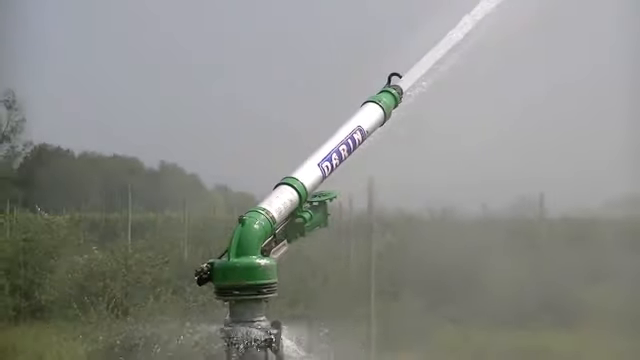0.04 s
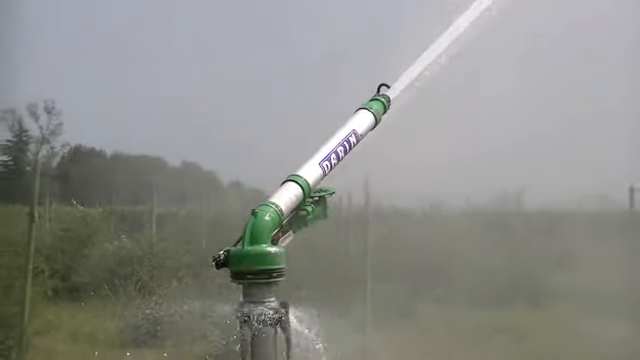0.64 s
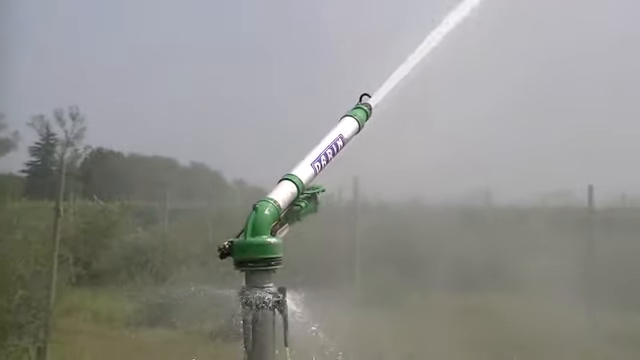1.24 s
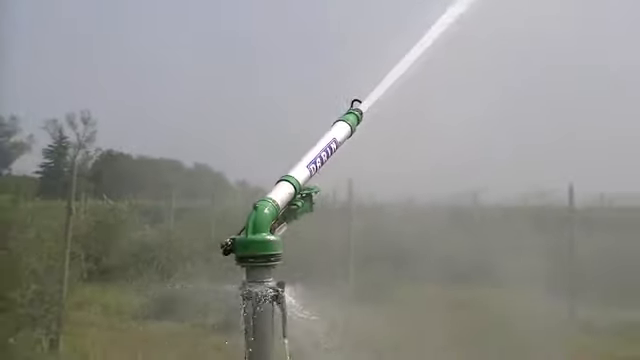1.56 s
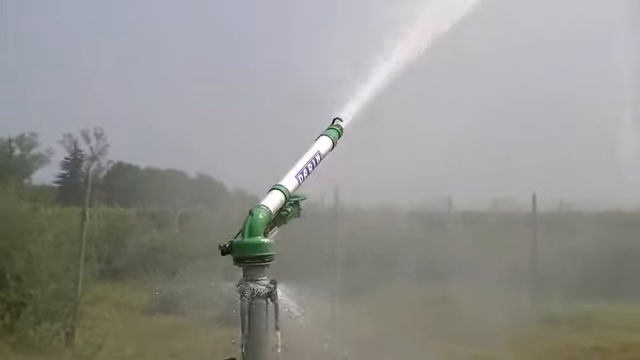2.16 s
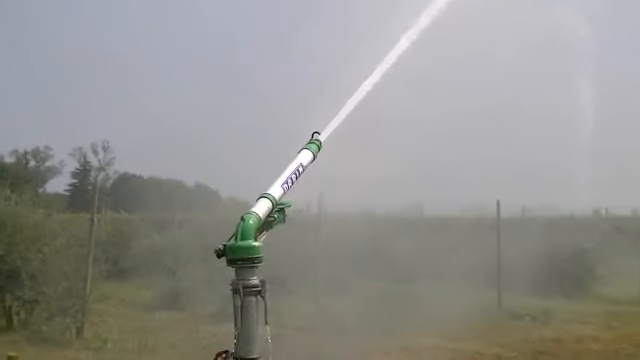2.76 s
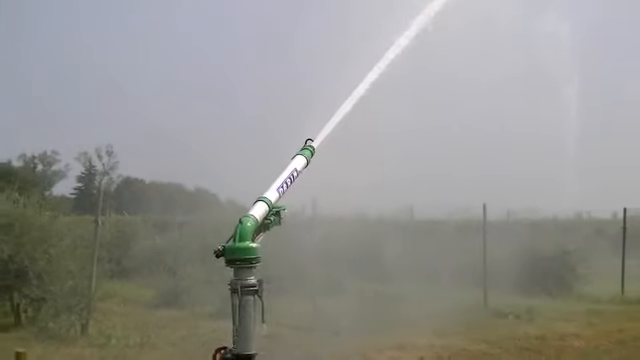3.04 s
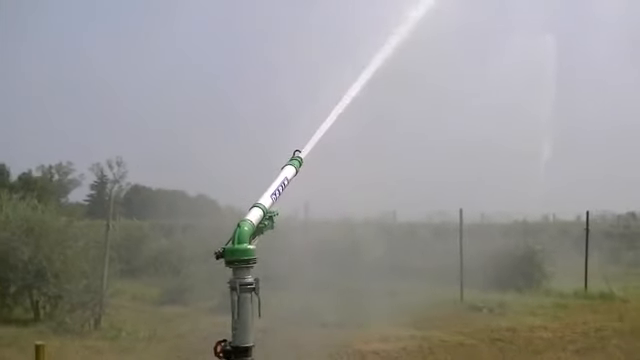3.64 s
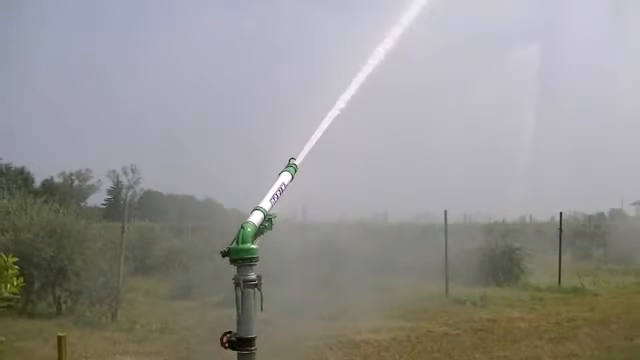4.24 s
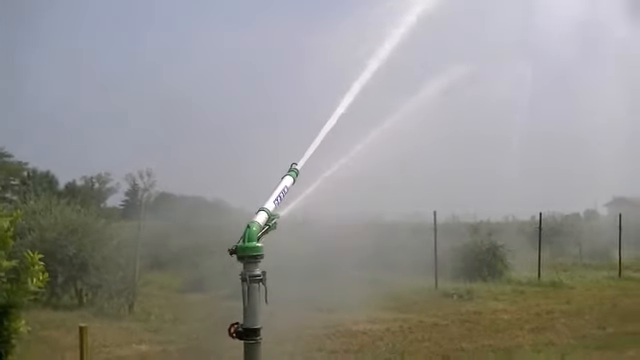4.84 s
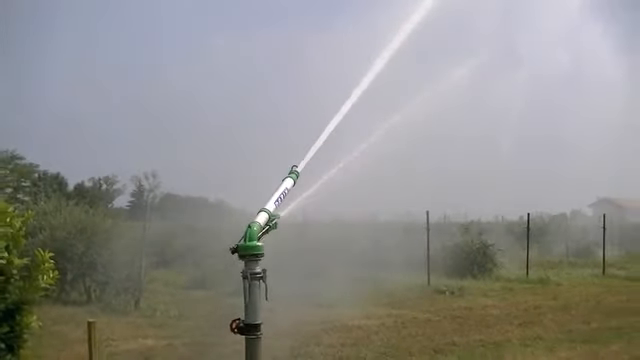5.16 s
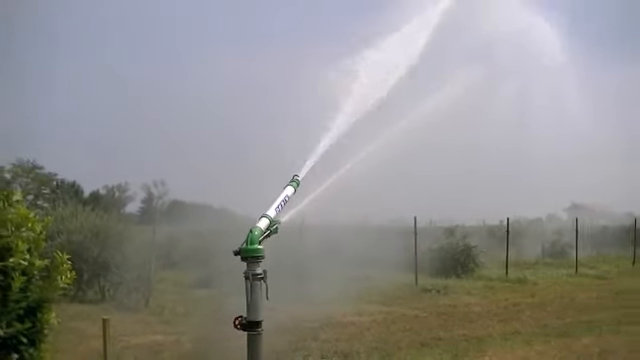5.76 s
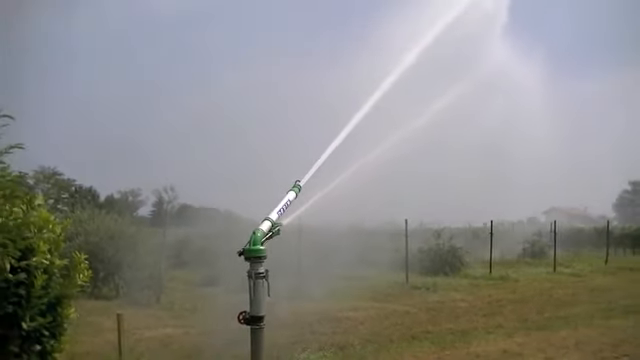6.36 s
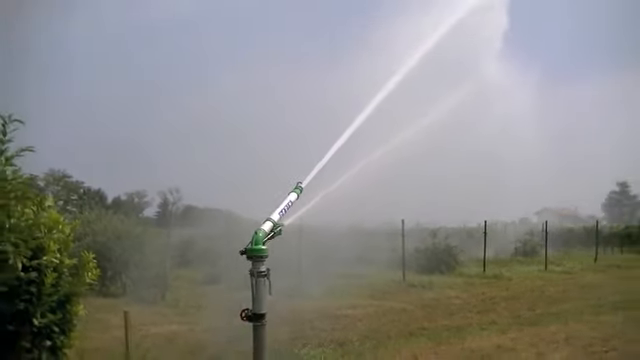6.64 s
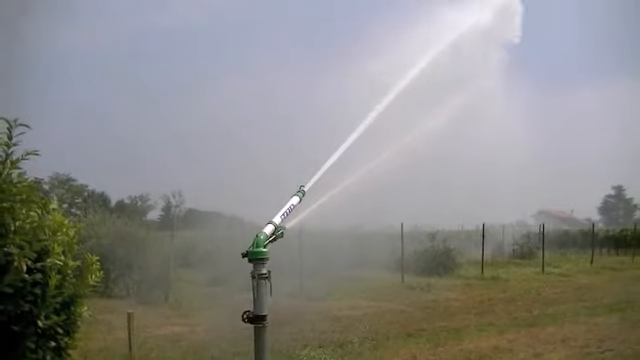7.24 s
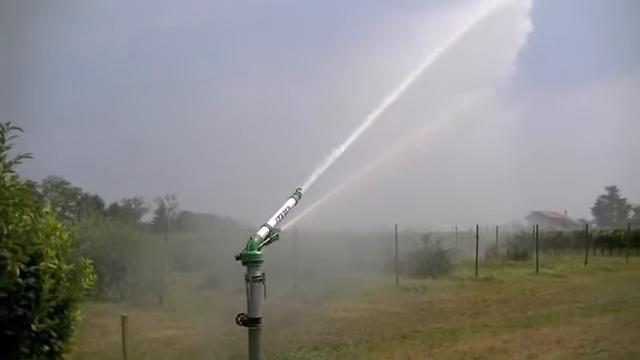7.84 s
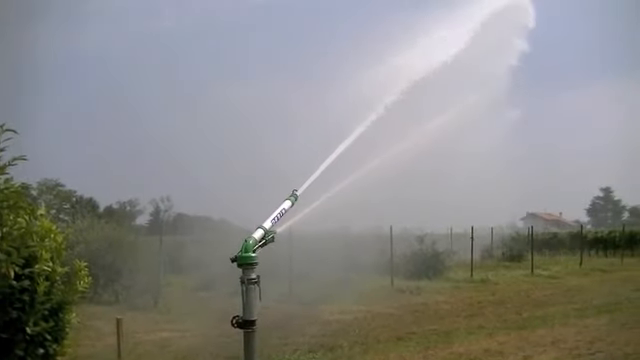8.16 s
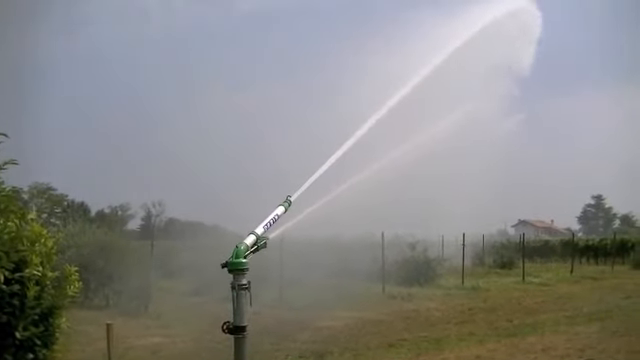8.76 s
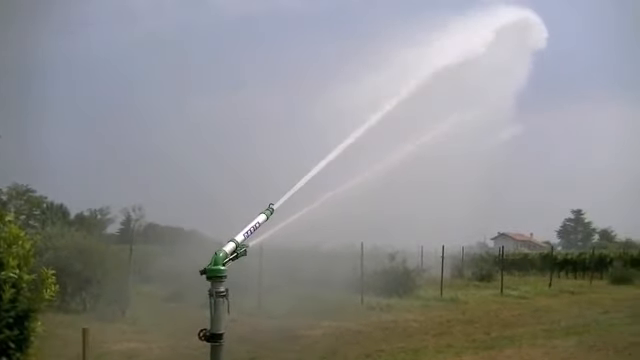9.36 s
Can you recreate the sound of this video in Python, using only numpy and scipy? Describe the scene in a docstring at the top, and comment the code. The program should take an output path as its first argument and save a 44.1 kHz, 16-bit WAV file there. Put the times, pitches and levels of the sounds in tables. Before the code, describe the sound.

A large irrigation sprinkler shoots a steady, hissing jet of water that swells softly about once a second, with a faint whine from its drive wheel. A leak hisses at first, then stops. Midway, a metal lever squeaks and clacks loudly with a short splash. Afterwards a brighter, sputtering spray joins in and the whine grows sharper. It is heard in mono from a few metres away in an open field, with a very faint distant pump hum.

```python
"""A big irrigation gun throws a water jet across a field, a few metres off, in mono.
From the start a far pump hums, the drive wheel sings faintly and the jet roars, bursting into spray
about once a second. A swivel leak hisses until it seals at 2.6 s. At 4.5 s the reversing lever squeals,
clacks over and slaps the jet; a drop ticks on metal before and after. The jet's roar dips briefly.
The wheel, now in the jet, slows, then sings brighter and chops off a second spray to the end."""
import sys
import numpy as np
from scipy import signal
from scipy.fft import rfft, irfft
from scipy.io import wavfile

SR = 44100
rng = np.random.default_rng(int(sys.argv[2]) if len(sys.argv) > 2 else 0)


def wav_out(sig):
    """Save sig, one row per channel (or a flat mono array), as 16-bit PCM at SR to the path in sys.argv[1]."""
    wavfile.write(sys.argv[1], SR, np.round(np.clip(np.atleast_2d(sig).T, -1, 1) * 32767).astype(np.int16))


N = 423360
T = np.arange(N) / SR
HZ = np.fft.rfftfreq(N, 1 / SR)

# wheel enters the jet, lever trips, wheel loses the water, catches it again
ENGAGE_S, TRIP_S, STALL_S, CATCH_S = 4.22, 4.515, 4.59, 4.75
SLAP_ATTACK_S = 0.032


def amp(db):
    """Decibels to gain."""
    return 10 ** (np.asarray(db) / 20)


def unit_rms(x):
    """Scale to rms 1."""
    return x / np.sqrt(np.mean(x ** 2) + 1e-20)


def curve(rows):
    """Rows of (seconds, value), interpolated at every sample."""
    return np.interp(T, *np.transpose(rows))


def ramp(start_s, length_s):
    """Linear rise from 0 to 1, then held."""
    return np.clip((T - start_s) / length_s, 0, 1)


def response(points):
    """Gain per frequency from rows of (Hz, dB), rolled off below the first."""
    hz, db = np.transpose(points)
    return amp(np.interp(np.log(HZ + 1), np.log(hz), db)) * np.minimum(HZ / hz[0], 1) ** 2


def colour(x, gain):
    """Minimum-phase filter, so clicks keep sharp fronts; output at rms 1."""
    log_gain = np.log(np.maximum(gain / gain.max(), 1e-5))
    phase = -signal.hilbert(np.r_[log_gain, log_gain[-2:0:-1]]).imag[:len(HZ)]
    return unit_rms(irfft(rfft(x) * np.exp(log_gain + 1j * phase), N))


def wander(rate_hz):
    """Random drift of rms 1, mostly slower than rate_hz."""
    noise = rfft(rng.standard_normal(N))
    return unit_rms(irfft(noise * (HZ > rate_hz / 20) / (1 + (HZ / rate_hz) ** 2), N))


def whistle(hz, width_hz):
    """Flow noise ringing one narrow resonance."""
    noise = rfft(rng.standard_normal(N))
    return unit_rms(irfft(noise / (1 + (2 * (HZ - hz) / width_hz) ** 2) ** 0.63, N))


def water(drops_per_s, spread_db, mist_db, sputter_db, sputter_hz):
    """Clumps of droplets, mostly small, in a mist; the finest spray smooths the top end."""
    sizes = amp(spread_db * np.minimum(rng.exponential(1, N), 3.5))
    drops = unit_rms(sizes * rng.choice([-1, 1], N) * (rng.random(N) < drops_per_s / SR))
    stream = drops + amp(mist_db) * rng.standard_normal(N)
    stream = unit_rms(stream * amp(sputter_db * wander(sputter_hz)))
    fine_share = 0.72 / (1 + (10500 / (HZ + 1)) ** 8)
    fine_spray = rfft(rng.standard_normal(N)) * np.sqrt(fine_share)
    return irfft(rfft(stream) * np.sqrt(1 - fine_share) + fine_spray, N)


def strikes(hits, spectrum, ring_db, contact_s=0.0008):
    """Hard blows on metal: impulse, short contact rattle, ring of the lever."""
    # Lever modes. Each row: frequency in Hz, relative level in dB, T60 in seconds.
    modes = [(1200, -9, .08), (1572, -9, .06), (2148, 0, .05), (2380, -5, .045), (3494, -7, .025),
             (4468, -5, .02), (5690, -13, .015)]
    out = np.zeros(N)
    for start_s, peak_db in hits:
        age_s = np.maximum(T - start_s, 0)
        blow = rng.standard_normal(N) * (T >= start_s) * np.exp(-age_s / contact_s)
        blow[round(start_s * SR) + 1] += 3.0
        ring = sum((-1) ** k * amp(db - 60 * age_s / t60_s) * np.cos(2 * np.pi * hz * age_s)
                   for k, (hz, db, t60_s) in enumerate(modes))
        hit = colour(blow, response(spectrum)) + amp(ring_db) * unit_rms(ring * (T >= start_s))
        out += amp(peak_db) * hit / abs(hit).max()
    return out


def engaged():
    """Depth of the wheel in the jet, 0 to 1."""
    return ramp(ENGAGE_S, TRIP_S - ENGAGE_S)


def dip(start_s=4.59, end_s=4.75, fall_s=0.041, rise_s=0.11):
    """1 during the brief dip in level after the clack, else 0."""
    return ramp(start_s - fall_s / 2, fall_s) * (1 - ramp(end_s - rise_s / 2, rise_s))


def bite(free_db=-10, driven_db=3, rise_s=0.11):
    """Gain of overtones and whistles, rising as the blades catch the jet."""
    return amp(free_db + (driven_db - free_db) * ramp(CATCH_S - rise_s, rise_s))


def pump():
    """A far pump hums, wavering in the open air."""
    # Each row: frequency in Hz, rms level in dB.
    partials = [(68.6, -77.5), (137, -69)]
    return np.sqrt(2) * sum(amp(db + 1.5 * wander(3.4)) * np.sin(2 * np.pi * hz * T + 0.45 * wander(3.2))
                            for hz, db in partials)


def ticks():
    """Near drops tick on metal."""
    # Each row: start in seconds, peak in dB.
    hits = [(3.7065, -11), (4.986, -19)]
    # Each row: frequency in Hz, relative density in dB.
    spectrum = [(1000, -25), (4500, -19), (7000, 8), (9000, 3), (12000, -18), (15000, -25)]
    return strikes(hits, spectrum, ring_db=-12)


def leak(start_db=-25, sag_db_per_s=0.6, seal_s=2.63, seal_db_per_s=140):
    """Water squeezes out of the swivel, weakening slowly until the joint seals."""
    # Each row: frequency in Hz, relative density in dB.
    spectrum = [(100, -49), (700, -31), (1400, -3.5), (2000, -1.5), (2300, 8.5), (2550, -5.5), (2800, 4),
                (3050, -5), (3400, 3), (3800, -2), (4550, 1), (5400, -6), (7200, 1.5), (9000, -9.5),
                (12000, -16), (15200, -45)]
    level_db = start_db - sag_db_per_s * T - seal_db_per_s * np.maximum(T - seal_s, 0)
    stream = water(3500, spread_db=2.6, mist_db=-0.82, sputter_db=0.58, sputter_hz=35)
    return amp(level_db) * colour(stream, response(spectrum))


def blade_hz(free_hz=671.2, driven_hz=710.4, kick_hz_per_s=850):
    """The wheel speeds up in the jet, is kicked by the slap, stalls, overshoots and settles."""
    sag_hz, spin_up_s, overshoot_hz, settle_s = 40.02, 0.065, 13, 0.25
    before_hz = free_hz + (driven_hz - free_hz) * engaged() + kick_hz_per_s * np.maximum(T - TRIP_S, 0)
    age_s = np.maximum(T - CATCH_S, -spin_up_s)
    after_hz = driven_hz - sag_hz * np.exp(-age_s / spin_up_s) + overshoot_hz * np.exp(-age_s / settle_s)
    return np.where(T < STALL_S, before_hz, after_hz)


def wheel(blades=8, free_db=-41, driven_db=-39.5, strain_db=4, dip_db=-10):
    """Blades chop the jet: one clear tone, with overtones that grow as they bite."""
    # Overtones. Each row: multiple of the shaft rate, relative level in dB.
    orders = [(14, -13.5), (16, -8.5), (24, -1), (40, -4.5), (48, -6), (56, -6.5)]
    turns = np.cumsum(blade_hz() * (1 + 0.002 * wander(13.6) + 0.001 * wander(1.52))) / SR / blades
    tone = np.sin(2 * np.pi * blades * turns) * amp(1.7 * wander(16))
    # slightly out of true: a side tone one shaft order lower
    side = np.sin(2 * np.pi * (blades - 1) * turns) * amp(3 * wander(9))
    overtones = sum(amp(db + 2.1 * wander(16)) * np.sin(2 * np.pi * (round(order) * turns + rng.random()))
                    for order, db in orders)
    lever_strain = engaged() ** 0.5 * (1 - ramp(TRIP_S, SLAP_ATTACK_S))
    level_db = free_db + (driven_db - free_db) * engaged() + strain_db * lever_strain + dip_db * dip()
    return np.sqrt(2) * amp(level_db) * (tone + amp(-14) * side + amp(-4) * bite() * overtones)


def drumming():
    """Spray rings the barrel and drive housing, which radiate no bass."""
    # Each row: frequency in Hz, width in Hz, relative level in dB.
    modes = [(1202, 60, -8.5), (1562, 53, -2.5), (2125, 116, -3), (2330, 116, 1.5), (2764, 110, 0),
             (3135, 150, -6.5), (3468, 137, -3), (4464, 220, -4.5), (4970, 110, -8.5), (5523, 120, -1.5),
             (6160, 97, -3), (7010, 187, 1.5)]
    power = sum(amp(db) ** 2 / (1 + (2 * (HZ - hz) / width_hz) ** 2) ** 2 for hz, width_hz, db in modes)
    stream = water(1800, spread_db=3.2, mist_db=-2.5, sputter_db=1.6, sputter_hz=40)
    return colour(stream, np.sqrt(power) * np.minimum(HZ / 800, 1) ** 2)


def edge_whistles():
    """Spray whistles thinly at the blade edges."""
    pitches_hz = [4463, 7645, 8352, 10522]
    # One row per pitch: width in Hz, relative level in dB at 4.8 s, the same at 9.6 s.
    bands = [(10, -20, -25), (55, -11.5, -10.5), (45, -19, -12), (70, -18.5, -26)]
    return sum(whistle(hz, width_hz) * amp(curve([(4.8, first_db), (9.6, last_db)]))
               for hz, (width_hz, first_db, last_db) in zip(pitches_hz, bands))


def spray(dip_db=-7.5):
    """Spray off the wheel hisses, drums, spits and whistles while the blades are in the jet."""
    # Hiss. Each row: frequency in Hz, relative density in dB.
    spectrum = [(100, -59), (1500, -15), (2300, -9), (3900, -9), (5500, -5), (6600, 1.5), (7300, -0.5),
                (9000, 0), (10300, -1), (11800, -9.5), (15200, -13)]
    # The gun swings round. Each row: time in seconds, gain in dB.
    swing = [(4.5, -27), (4.9, -26), (6.3, -26), (7.4, -24.5), (8.5, -24.5), (9.6, -26)]
    stream = water(4000, spread_db=4.5, mist_db=-1, sputter_db=1.0, sputter_hz=54)
    hiss = colour(stream, response(spectrum))
    housing = drumming()
    spit_band = np.exp(-((HZ - 7600) / 900) ** 2 / 2)
    spits = colour(rng.standard_normal(N) * amp(3.8 * np.clip(wander(70), -2.5, 2.5)), spit_band)
    mix = amp(-3.5) * hiss + amp(-6) * housing + amp(-8) * spits + bite() * edge_whistles()
    return engaged() * amp(curve(swing) + dip_db * dip()) * mix


def lever(squeal_hz=4980, squeal_db=-36, squeal_s=0.12, slap_db=-15, hold_s=0.0063, fall_db_per_s=430):
    """The reversing lever squeals under load, clacks on its stops and slaps through the jet."""
    # Blows on the stops. Each row: start in seconds, peak in dB.
    hits = [(4.5155, 1), (4.5184, -12), (4.5369, -9)]
    # Each row of both: frequency in Hz, relative density in dB.
    clack_spectrum = [(300, -34), (800, -13), (1400, -1), (2300, -1), (4300, 1.5), (6200, 0), (8000, -12),
                      (15000, -20)]
    slap_spectrum = [(200, -23), (600, -12), (1200, 0.5), (2300, 1.5), (3700, -1), (4600, 3), (6000, -4),
                     (8200, 5), (10500, -6.5), (15500, -18)]
    tripped = ramp(TRIP_S, SLAP_ATTACK_S)
    load = ramp(TRIP_S - squeal_s, squeal_s) ** 0.5 * (1 - tripped)
    squeal = amp(squeal_db) * load * whistle(squeal_hz, width_hz=50)
    clack = strikes(hits, clack_spectrum, ring_db=2.2)
    splash = water(5500, spread_db=1.7, mist_db=-0.91, sputter_db=0.8, sputter_hz=150)
    falling_s = np.maximum(T - TRIP_S - SLAP_ATTACK_S - hold_s, 0)
    slap_gain = tripped ** 1.7 * amp(slap_db - fall_db_per_s * falling_s)
    return squeal + clack + slap_gain * colour(splash, response(slap_spectrum))


def bursts():
    """The jet fans out and tears apart; coarse drops add a lower, rougher rush."""
    # Each row: centre in seconds, level in dB, Gaussian sigma in seconds.
    swells = [(1.094, -31.5, 0.11), (2.28, -30, 0.11), (3.49, -30.5, 0.11), (5.855, -29, 0.11),
              (6.98, -29, 0.077), (8.115, -28, 0.085), (9.257, -32, 0.15)]
    # Each row: frequency in Hz, relative density in dB.
    spectrum = [(60, -38), (250, -10), (600, -2.5), (1200, -1.5), (2300, 2.5), (4000, -7.5), (8000, -6.5),
                (15000, -22)]
    gain = sum(amp(db) * np.exp(-((T - centre_s) / sigma_s) ** 2 / 2) for centre_s, db, sigma_s in swells)
    stream = water(900, spread_db=1.9, mist_db=-5.5, sputter_db=1.0, sputter_hz=56)
    return gain * colour(stream, response(spectrum))


def jet(crossover_hz=5000, dip_db=-2.5):
    """The jet tears at the air and its fine droplets fizz; the roar dips briefly after the clack."""
    # Each row: frequency in Hz, relative density in dB.
    spectrum = [(45, -42), (90, -28), (170, -19.5), (280, -6), (410, -12), (570, -1.5), (1300, -2.5),
                (2200, 0.5), (4000, -6), (7000, 0), (8500, 1), (12000, -14), (13300, -13.5), (15200, -18.5)]
    # The gun swings round. Each row: time in seconds, rms level in dB.
    swing = [(0, -28), (2.6, -28), (3.1, -28.5), (4.3, -28.5), (5.2, -28), (9.6, -27)]
    treble_share = 1 / (1 + (crossover_hz / (HZ + 1)) ** 4)
    core = water(3000, spread_db=2.67, mist_db=-0.89, sputter_db=0.5, sputter_hz=32)
    droplets = water(3000, spread_db=4.2, mist_db=-0.99, sputter_db=1.24, sputter_hz=40)
    roar = colour(core, response(spectrum) * np.sqrt(1 - treble_share))
    fizz = colour(droplets, response(spectrum) * np.sqrt(treble_share))
    return amp(curve(swing) + dip_db * dip()) * unit_rms(roar + amp(-2) * fizz)


def scene():
    """All sources at one point in the open field."""
    mono = jet() + bursts() + leak() + spray() + wheel() + lever() + ticks() + pump()
    return np.array([mono, mono])


def record(dry):
    """Hard clip, then low-pass."""
    ceiling, cutoff_hz = 0.88, 15720
    lowpass = signal.firwin(1023, cutoff_hz, window=("kaiser", 9), fs=SR)
    return signal.oaconvolve(np.clip(dry, -ceiling, ceiling), lowpass[None], "same")


dry = scene()
out = record(dry)
wav_out(out)
```